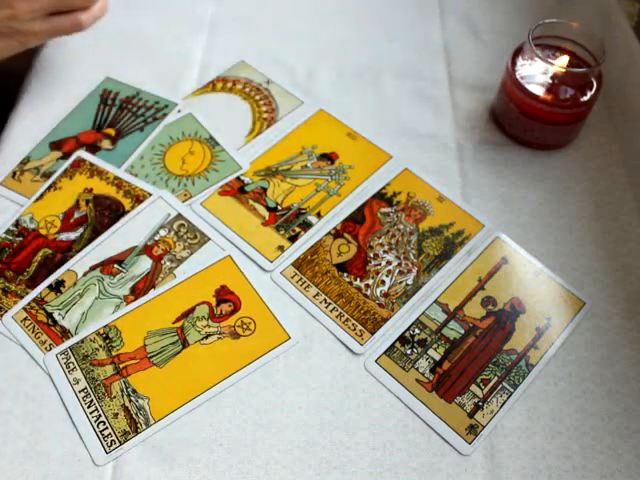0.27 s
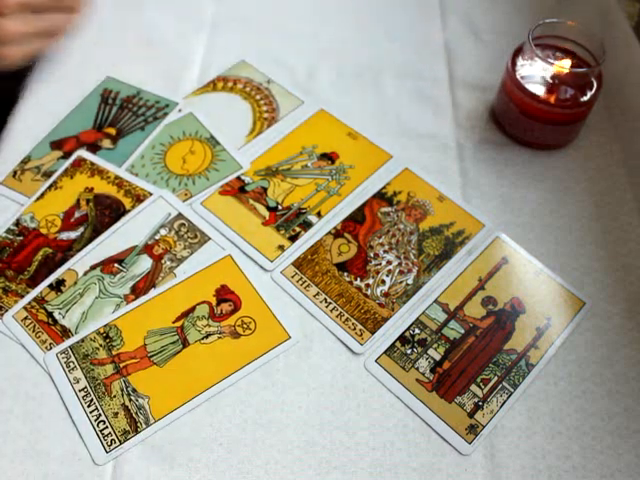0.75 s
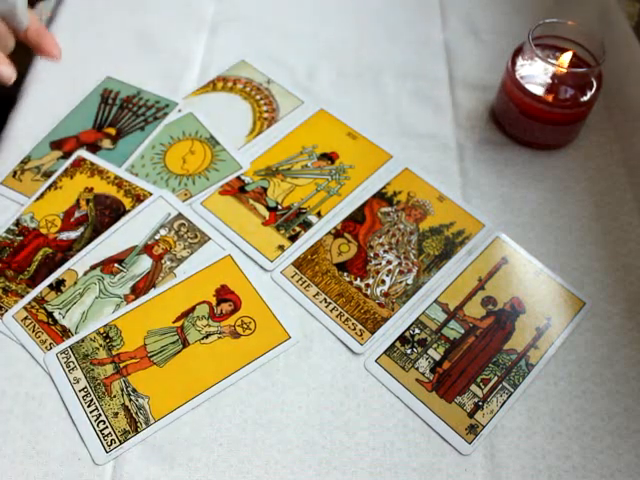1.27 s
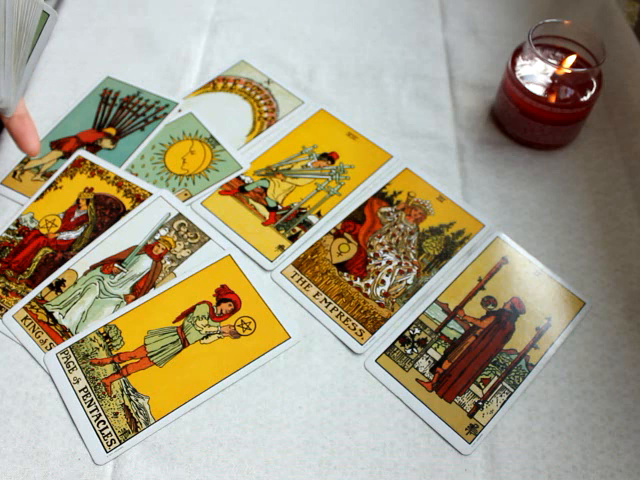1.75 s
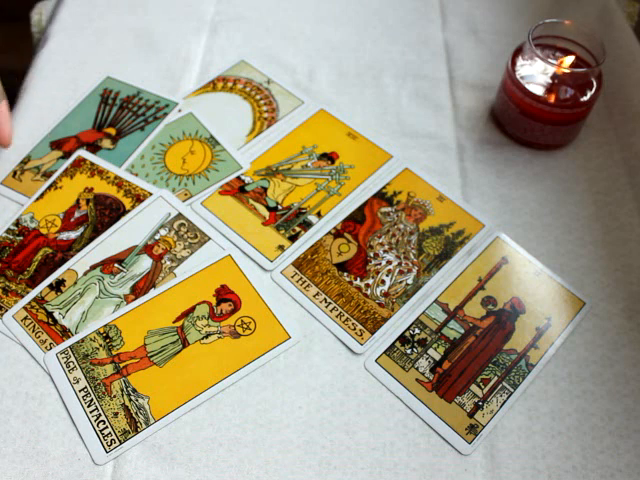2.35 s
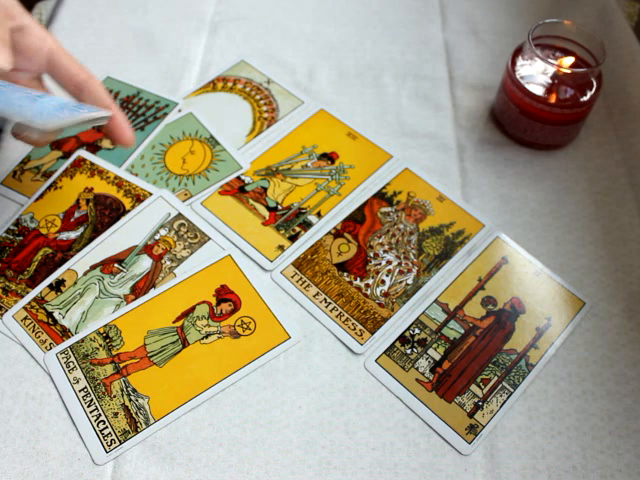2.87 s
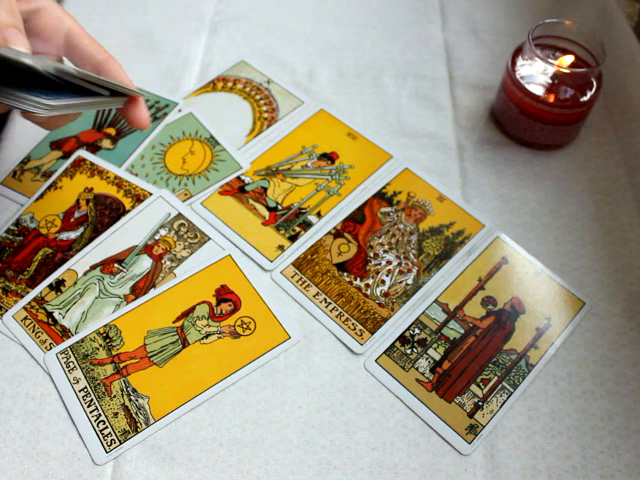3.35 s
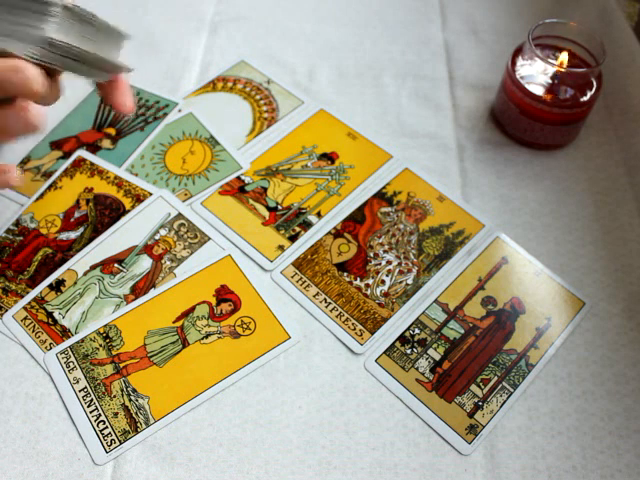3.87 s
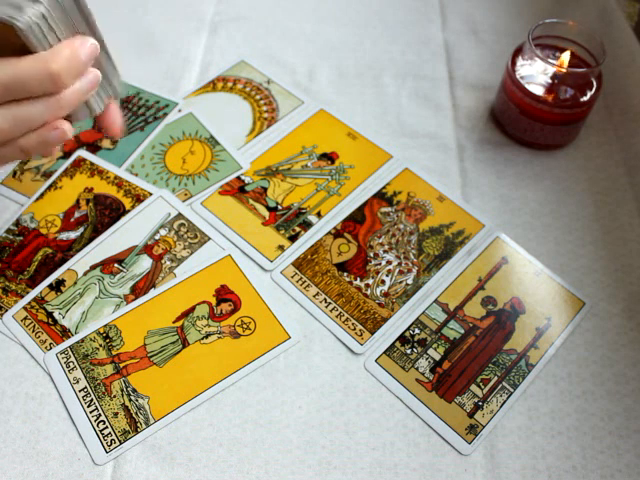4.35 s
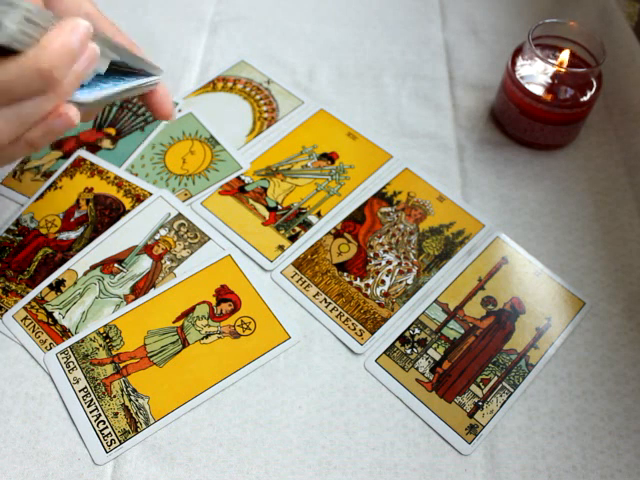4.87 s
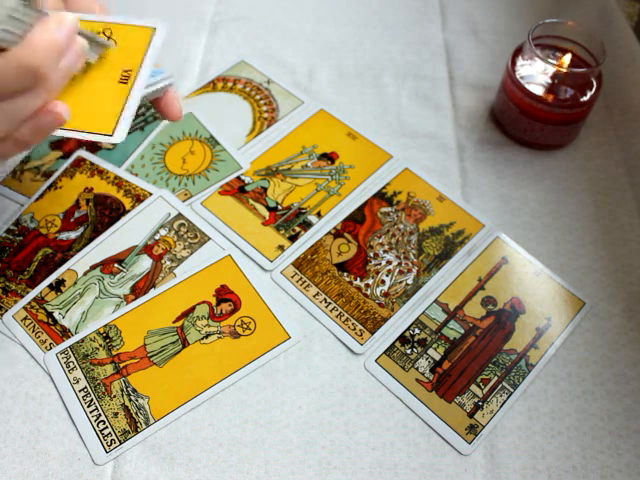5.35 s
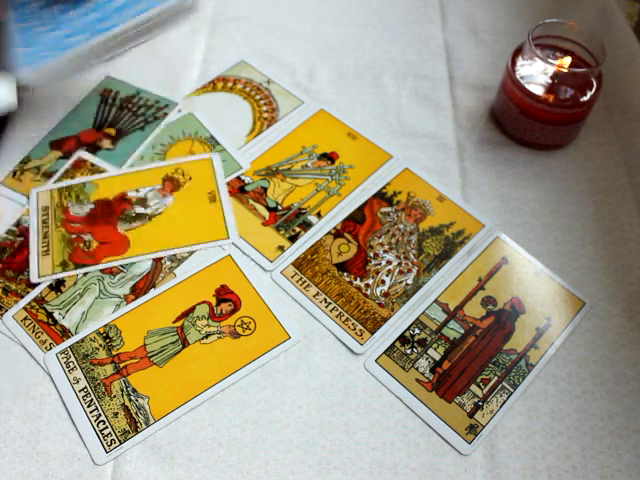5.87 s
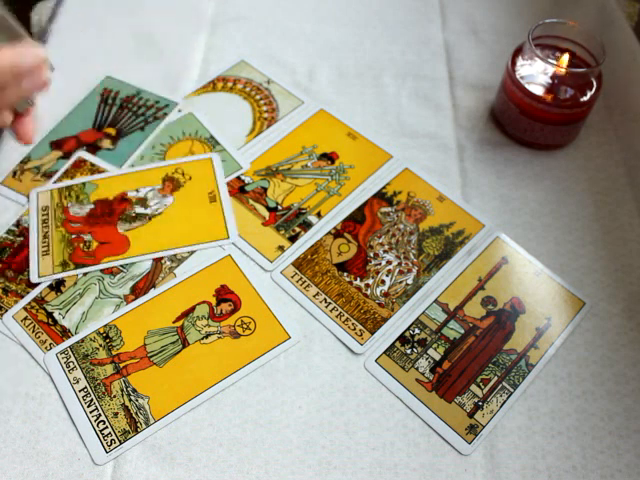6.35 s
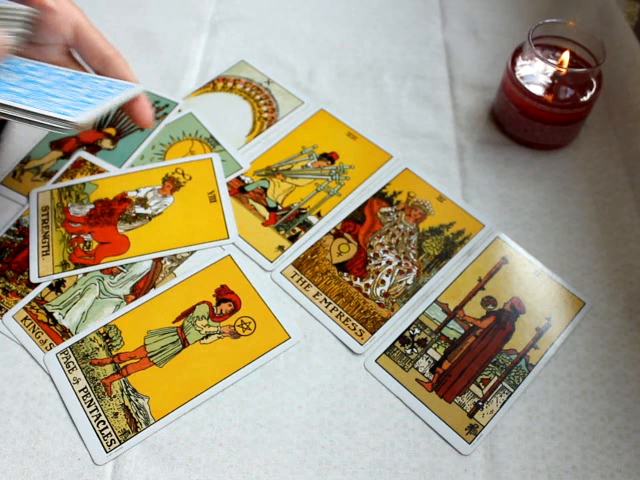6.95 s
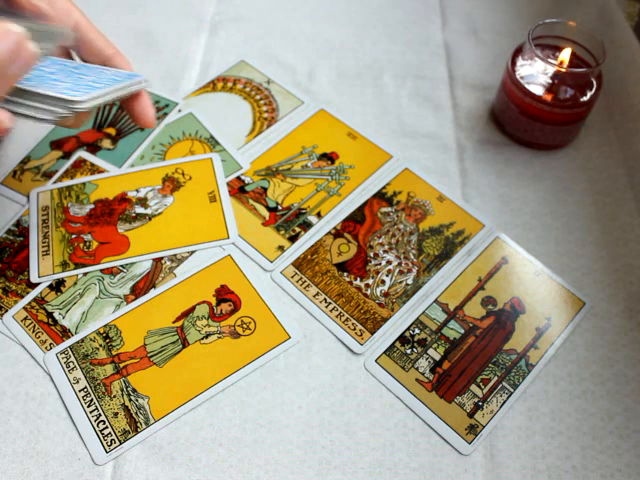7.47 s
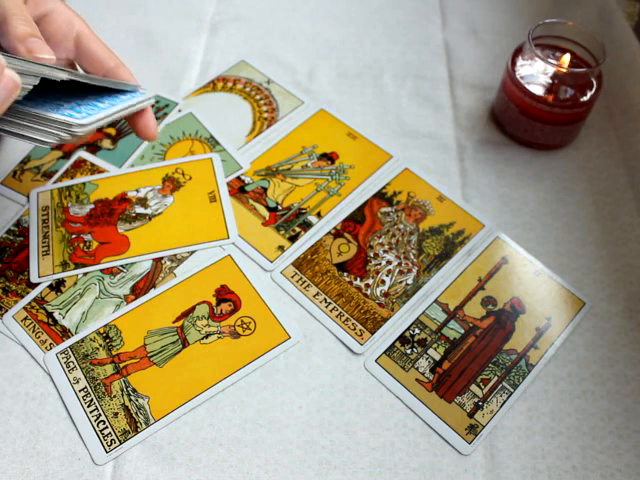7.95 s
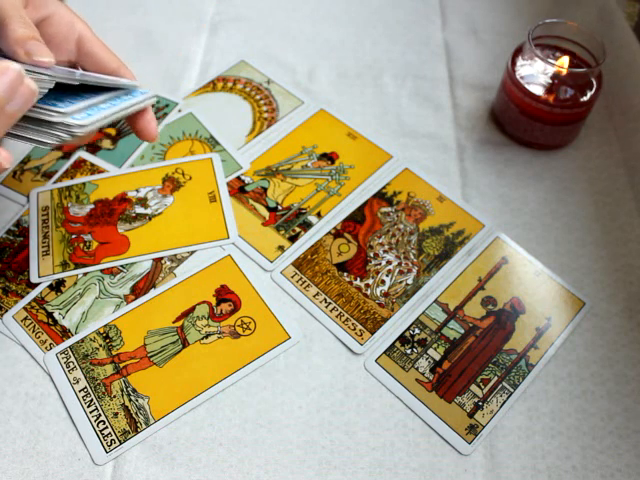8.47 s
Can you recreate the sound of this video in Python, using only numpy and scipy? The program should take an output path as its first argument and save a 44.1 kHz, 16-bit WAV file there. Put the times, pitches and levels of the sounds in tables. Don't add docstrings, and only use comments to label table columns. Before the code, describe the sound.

A stiff deck knocks on a wooden table, then is shuffled overhand in snapping clusters, with one card flicked out loudly and laid down.

```python
import sys
import numpy as np
from scipy import signal
from scipy.fft import rfft, irfft
from scipy.io import wavfile
from scipy.ndimage import uniform_filter1d

SR = 44100
rng = np.random.default_rng(int(sys.argv[2]) if len(sys.argv) > 2 else 0)


def persist_wave(psi):
    counts = np.round(np.clip(psi, -1, 1) * 32767).astype(np.int16)
    wavfile.write(sys.argv[1], SR, np.atleast_2d(counts).T)


def natural_amplitude(level_db):
    exponent = np.asarray(level_db, float) / 20
    return 10 ** exponent


N = 384111


def band(x, lo_hz, hi_hz):
    return signal.sosfilt(signal.butter(2, [lo_hz, min(hi_hz, .45 * SR)], "band", fs=SR, output="sos"), x)


def tilt_high(x):
    return signal.lfilter([.3], [1, -.7], band(x, 3000, 18000))


def ring(x, hz, t60_s):
    r = natural_amplitude(-60 / (max(t60_s, .001) * SR))
    w = 2 * np.pi * hz / SR
    return signal.lfilter([0, np.sin(w)], [1, -2 * r * np.cos(w), r * r], x)


def rms_one(x):
    return x / np.sqrt(np.mean(x ** 2) + 1e-20)


def peak_one(x):
    return x / np.max(np.abs(x))


def add(out, start_s, piece):
    i = round(start_s * SR)
    out[i:i + len(piece)] += piece[:N - i]


def rumble():
    # (time [s], level [dB])
    rumble_level = [(0.0, -72), (2.06, -81), (4.39, -79.5), (8.44, -68), (8.71, -85)]
    level_db = np.interp(np.arange(N) / SR, *np.transpose(rumble_level))
    return natural_amplitude(level_db - 8) * rms_one(band(rng.standard_normal(N), 35, 180))


def hiss():
    # (frequency [Hz], density [dB per Hz])
    floor_colour = [(15, -32.5), (25, -2.5), (97, -13.5), (167, -2.5), (225, -2), (310, -4.5), (550, -2.5),
                    (900, -1.5), (2000, -2.5), (3800, -4.5), (6000, -7), (9000, -10), (12000, -10.5),
                    (16000, -10)]
    # (time [s], level [dB])
    floor_sway = [(0.0, 0.5), (8.71, 0.0)]
    hz = np.fft.rfftfreq(N, 1 / SR) + 1
    points = np.array(floor_colour)
    colour = natural_amplitude(np.interp(np.log(hz), np.log(points[:, 0]), points[:, 1]))
    sway_db = np.interp(np.arange(N) / SR, *np.transpose(floor_sway))
    noise = irfft(rfft(rng.standard_normal(N)) * colour, N)
    return natural_amplitude(-55.5 + sway_db) * rms_one(noise)


def ducking(x, above_db, share, back_db_per_s):
    level_db = 10 * np.log10(uniform_filter1d(x ** 2, size=441) + 1e-12)
    cut_db = share * np.maximum(level_db - above_db, 0)
    ramp_db = back_db_per_s * np.arange(N) / SR
    return natural_amplitude(ramp_db - np.maximum.accumulate(cut_db + ramp_db))


def room(x):
    # (frequency [Hz], echo level [dB], t60 [s])
    echo_bands = [(310, -13.5, 0.26), (950, -16.5, 0.31), (2380, -12.5, 0.21), (4900, -18.5, 0.4),
                  (11100, -18, 0.18)]
    t = np.arange(SR // 2) / SR
    white = rng.standard_normal((len(echo_bands), len(t)))
    echo = 0
    for (hz, db, t60_s), w in zip(echo_bands, white):
        tail = band(w, hz / 1.66, hz * 1.23) * natural_amplitude(-60 * t / t60_s) * np.clip(t / 0.00043, 0, 1)
        share = np.sqrt(hz * 2.38 / (SR / 2))
        echo = echo + natural_amplitude(db) * share * tail / np.sqrt(np.sum(tail ** 2))
    return signal.fftconvolve(x, echo)[:N]


def knock():
    # (time [s], level [dB])
    deck_hit = (.5008, -10)
    # (frequency [Hz], level [dB], t60 [s])
    edge_modes = [(1314, -4, 0.0251), (2800, -3.5, 0.01), (4400, -10, 0.014)]
    # (frequency [Hz], level [dB], t60 [s])
    wood_modes = [(225, -6, 0.1), (249, -15.5, 0.21), (372, 0, 0.12), (515, -9.5, 0.14), (687, -11, 0.12),
                  (875, -13, 0.17), (956, -21.5, 0.28), (999, -1, 0.15), (1080, -8.5, 0.11),
                  (1150, -32.5, 0.21), (1324, -25, 0.11), (1380, -36, 0.43), (1820, -33, 0.46),
                  (1860, -18.5, 0.18)]
    # (frequency [Hz], level [dB], t60 [s])
    wood_noise = [(94.5, -19, 0.33), (455, -18.5, 0.25), (840, -15, 0.24), (1415, -9, 0.13),
                  (1920, -26, 0.051), (2680, -21, 0.078), (3330, -53, 0.023), (4824, -43, 0.097)]
    contact_s = .0004
    t = np.arange(SR // 2) / SR
    push = np.where(t < contact_s, np.sin(np.pi * t / contact_s) ** 2, 0) / 5
    body = sum(natural_amplitude(db) * ring(push, hz, t60_s) for hz, db, t60_s in edge_modes)

    for (hz, db, t60_s), turn in zip(wood_modes, rng.random(len(wood_modes))):
        envelope = natural_amplitude(db - 60 * t / t60_s) * (1 - np.exp(-t * hz / 2.7))
        body = body + envelope * np.sin(2 * np.pi * (hz * t + turn))

    white = rng.standard_normal((len(wood_noise), len(t)))
    for (hz, db, t60_s), w in zip(wood_noise, white):
        dying = w * natural_amplitude(db - 60 * t / t60_s) * (1 - np.exp(-(t * hz / 1.9) ** 2))
        lo_hz, hi_hz = hz / 1.63, hz * 1.3
        body = body + band(band(dying, lo_hz, hi_hz), lo_hz, hi_hz) * np.sqrt(SR / hz)

    out = np.zeros(N)
    hit_s, hit_db = deck_hit
    add(out, hit_s, natural_amplitude(hit_db) * body)
    return out


def rubs():
    # (start [s], length [s], rms [dB], pocket [Hz], hiss re rms [dB])
    pulls = [(1.15, 0.26, -66, 3300, -2), (1.468, 0.065, -51, 2520, -22), (3.25, 0.046, -55.5, 2500, -14),
             (3.385, 0.087, -53.5, 3200, -15), (3.7115, 0.04, -49, 4530, 1),
             (3.8434, 0.095, -54, 2500, -3.5), (4.17, 0.09, -69, 3200, 14.5), (4.59, .066, -57, 2600, 2.5),
             (5.045, 0.045, -51, 2030, -18), (5.082, 0.026, -47, 2020, -1), (5.2443, 0.023, -18, 1450, -20),
             (5.44, .11, -56.5, 2250, -18), (5.63, 0.035, -53, 1150, -20), (6.0713, 0.025, -43, 8100, -1.5),
             (6.28, 0.086, -58, 2400, 0.5), (6.41, .055, -63, 3400, 3), (6.805, 0.047, -48, 3500, 4),
             (7.1137, 0.033, -42, 1460, 1), (7.185, 0.018, -49, 2200, -16), (7.28, 0.047, -55.5, 1600, -7),
             (7.3165, 0.024, -47.5, 3360, -18), (8.05, 0.2, -60.5, 950, -6), (8.1, 0.07, -57, 1920, -13),
             (8.36, 0.048, -54, 2600, -12)]
    # (start [s], length [s], rms [dB], pocket [Hz], hiss re rms [dB])
    skids = [(3.104, 0.047, -40.5, 2920, -3), (3.122, 0.088, -45, 1600, -19), (3.516, 0.065, -44, 750, -18),
             (3.727, 0.08, -42, 2040, -1), (3.92, 0.18, -70, 3700, 10), (4.9148, 0.0067, -27.5, 2980, -1),
             (4.922, .08, -48.5, 1400, -9), (5.2143, 0.014, -43.5, 800, -16),
             (5.2327, 0.013, -22, 1210, -13), (5.5866, .045, -56, 950, -18),
             (5.6971, .03, -34.5, 1080, -16), (5.72, 0.074, -45.5, 1630, -19), (5.79, .03, -48, 3500, -11),
             (5.8224, 0.044, -44, 2280, -8), (6.0863, 0.037, -35, 3000, -0.5),
             (6.1059, 0.043, -36.5, 2600, -6), (6.7891, 0.027, -51.5, 2900, 1),
             (7.14, 0.064, -55, 1380, -10), (7.2441, 0.041, -53.5, 2100, -1),
             (7.3337, 0.056, -54, 2050, -12), (7.5745, 0.047, -46.5, 1390, -6),
             (8.1627, .055, -49.5, 1800, -6), (8.3875, 0.1, -58, 1900, -10)]
    # (events, pocket re rms [dB], body re rms [dB], place of the peak [0-1])
    stroke_kinds = [(pulls, -1.6, -19, 0.45), (skids, -2.7, -15.5, 0.089)]
    grains = rng.standard_normal(N) * natural_amplitude(0.72 * np.minimum(rng.exponential(1, N), 4))
    grains *= natural_amplitude(2.5 * rms_one(band(rng.standard_normal(N), 22, 400)))
    out = np.zeros(N)
    for events, pocket_db, body_db, peak_at in stroke_kinds:
        bend = np.log(.5) / np.log(np.clip(peak_at, .05, .9))
        for start_s, length_s, db, hz, hiss_db in events:
            catch = grains[round(start_s * SR):round((start_s + length_s) * SR)]
            stroke = np.sin(np.pi * (np.arange(len(catch)) / len(catch)) ** bend)
            pocket = natural_amplitude(pocket_db) * rms_one(ring(catch, hz, 10 / hz))
            pocket = pocket + rms_one(band(catch, .6 * hz, 1.3 * hz + 2000))
            treble = natural_amplitude(hiss_db) * rms_one(tilt_high(catch))
            body = natural_amplitude(body_db) * rms_one(band(catch, 170, 1900))
            add(out, start_s, natural_amplitude(db + 4) * stroke * (rms_one(pocket) + treble + body))
    return out


def snaps():
    # (time [s], peak [dB], card ring [Hz], crack re peak [dB])
    ticks = [(.9722, -36.5, 3500, -5.5), (1.3172, -44, 2480, -9), (1.3611, -42, 3770, -5),
             (1.5236, -41, 2410, -13), (1.5341, -38, 2930, -14), (1.5624, -50, 1610, -9),
             (1.5771, -31, 3180, -7), (1.8592, -53, 1360, -8), (2.0134, -37.5, 2560, -3),
             (2.4319, -45, 1970, -2), (2.5422, -48, 3810, -1), (2.7331, -46, 2910, -4),
             (2.866, -41, 1460, -14), (3.8434, -38, 1030, -15), (4.1526, -53, 5770, 9),
             (4.2084, -48, 5790, 7), (4.6814, -41.5, 3010, -3), (5.022, -43, 1630, -24),
             (5.4661, -44, 1830, -12), (5.5287, -39.5, 1820, -3), (5.5527, -42.5, 800, -3),
             (5.6067, -42, 1460, -3), (6.0532, -44, 1720, -3), (6.3115, -34.5, 6000, -3.5),
             (6.8905, -38.5, 2500, -4), (7.3596, -39, 2390, -6), (8.3715, -43, 3320, -5)]
    drops = [(3.104, -18.5, 1770, -7), (3.1164, -26, 1210, -4), (3.1225, -16.5, 3900, 1),
             (3.1937, -42, 1680, 4), (3.2005, -32, 1900, -10), (3.516, -25, 1010, -15),
             (3.5249, -38, 1850, -3), (3.5385, -37.5, 3730, 5), (3.5441, -31, 860, -3),
             (3.7115, -45, 5000, 6), (3.7224, -21.5, 6480, -18), (3.7335, -21.5, 2560, -8),
             (4.9072, -28, 2020, -5), (4.9148, -15, 2170, -1), (4.9178, -12, 2430, -3.5),
             (4.9845, -29, 1680, -15), (4.9934, -37, 1530, -22), (5.0955, -42, 3680, -7)]
    flick = [(5.1911, -25, 2220, -26), (5.2143, -42, 710, -19), (5.2327, -14, 457, -12),
             (5.2372, -4, 1940, -9), (5.2443, 1.5, 2500, -9.5), (5.2508, -15, 1640, -7),
             (5.2553, -4, 1560, -19), (5.2605, -4, 1700, -22), (5.2655, -19, 1500, -17),
             (5.2755, -38, 1700, -5), (5.2796, -18, 1530, -21), (5.3286, -41, 1720, -25),
             (5.368, -47, 1270, -22), (5.4335, -24.5, 2630, -15), (5.6916, -8.5, 3000, -13),
             (5.7373, -23, 2750, -11), (5.7674, -37, 2730, -13), (5.7883, -21.5, 3600, -4),
             (5.8106, -40, 4310, -15), (5.8224, -19, 2410, -4)]
    drops_again = [(6.0713, -30, 2260, -1), (6.0863, -22, 2030, -16), (6.0895, -24, 3500, 4),
                   (6.1059, -28, 2070, -10), (6.1094, -15.5, 3640, -15), (6.7891, -33, 2760, -13),
                   (6.7982, -35, 2610, -5), (7.118, -40, 1900, -5), (7.1251, -28, 2140, -12),
                   (7.1298, -21, 2480, -3.5), (7.1937, -31, 1970, -23), (7.1989, -37, 1960, -12),
                   (7.2441, -30, 5000, -4), (7.3165, -30.5, 890, -5), (7.3337, -36, 3730, -19),
                   (7.5741, -37, 1140, -2), (8.1484, -13.5, 3600, -24), (8.1627, -21, 4560, 2),
                   (8.1758, -31.5, 400, -2), (8.3806, -30, 2280, -2), (8.3848, -36.5, 2930, 4),
                   (8.3875, -29, 1880, -3)]
    pops = [(3.1135, -24, 1800, -7), (3.1813, -34, 1680, -8), (3.553, -38, 810, -12),
            (3.7598, -35, 1070, 6), (4.1903, -52, 3620, 9), (5.1878, -35, 2000, -25),
            (5.3103, -31.5, 1940, -2), (5.3787, -41, 1420, -20), (5.5866, -36.5, 930, -4),
            (5.6971, -11.5, 1052, -30), (7.1137, -26.5, 1810, -4), (7.3177, -26, 1846, -18),
            (7.586, -33.5, 1715, 6)]
    # (events, thump re peak [dB], ring t60 [s])
    snap_kinds = [(ticks, -13, 0.01), (drops, -32.5, 0.0091), (flick, -17.5, 0.0083),
                  (drops_again, -26, 0.011), (pops, -11, 0.038)]
    thump_loss = 0.33
    out = np.zeros(N)
    t = np.arange(2048) / SR
    for events, thump_db, t60_s in snap_kinds:
        white = rng.standard_normal((len(events), len(t)))
        for (start_s, db, hz, crack_db), noise in zip(events, white):
            slip = noise * natural_amplitude(-60 * t / min(1.33 * t60_s, .009))
            slip[0] = 5.5
            card = peak_one(ring(slip, hz, 1.23 * t60_s)) + 1.08 * peak_one(band(slip, 700, 5440))
            crack = natural_amplitude(crack_db + 7) * peak_one(tilt_high(slip))
            puff = peak_one(band(noise * natural_amplitude(-60 * t / 0.022), 340, 1400))
            thump = natural_amplitude(thump_db - 10 - thump_loss * (db + 25)) * puff
            add(out, start_s, natural_amplitude(db) * (peak_one(card) + crack + thump))
    return out


def air_push(edges):
    return natural_amplitude(-43) * band(np.tanh(np.abs(edges) / .15), 78, 180)


def scene():
    edges = snaps()
    near = edges + rubs() + knock()
    mic_low_cut = signal.butter(3, 280, "high", fs=SR, output="sos")
    sound = signal.sosfilt(mic_low_cut, near + room(near)) + air_push(edges)
    gain = ducking(sound, above_db=-16.5, share=0.7, back_db_per_s=9)
    return (sound + (hiss() + rumble()) * gain)[None]


def band_limit(x):
    return signal.sosfilt(signal.butter(12, 17000, fs=SR, output="sos"), x)


def record(dry):
    top_cut = signal.ellip(12, .3, 60, 15850, fs=SR, output="sos")
    mix = signal.sosfilt(top_cut, np.clip(dry + 0.0011, -1, 1))
    return band_limit(mix)


dry = scene()
out = record(dry)
persist_wave(out)
```